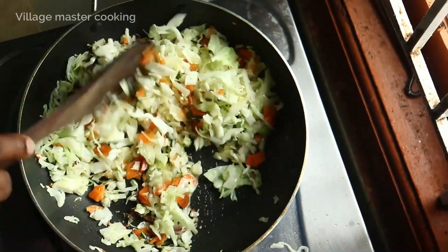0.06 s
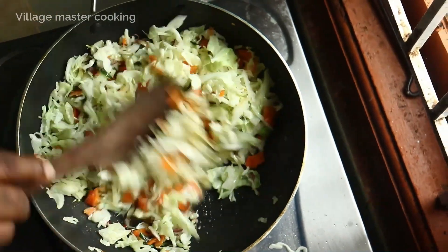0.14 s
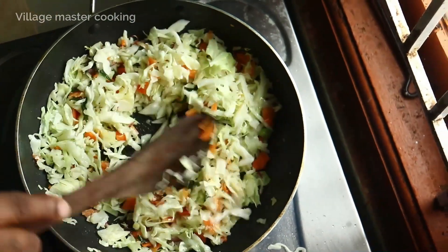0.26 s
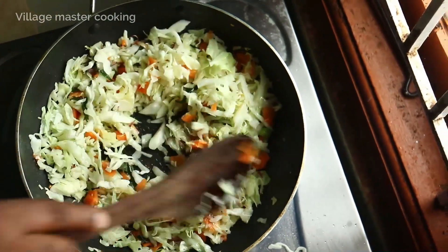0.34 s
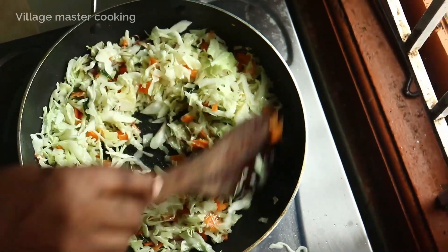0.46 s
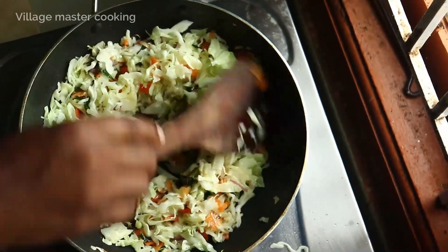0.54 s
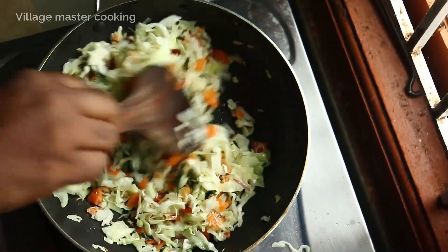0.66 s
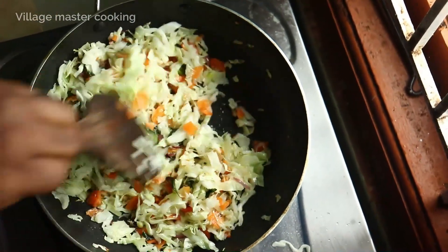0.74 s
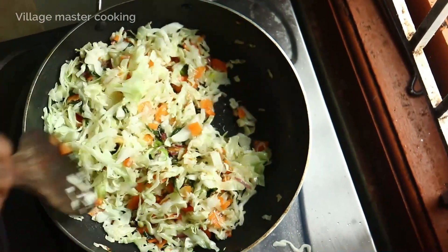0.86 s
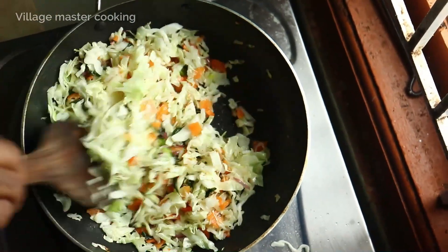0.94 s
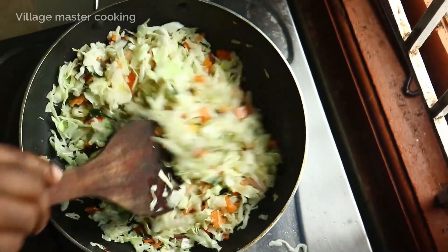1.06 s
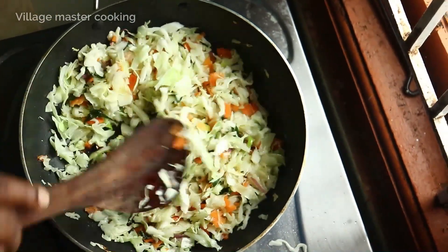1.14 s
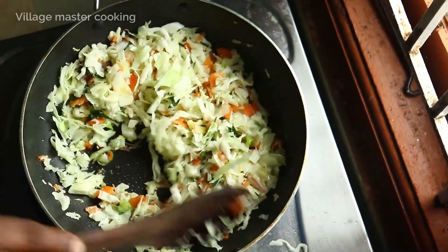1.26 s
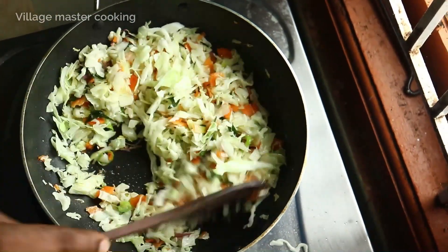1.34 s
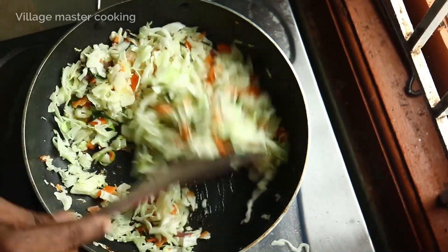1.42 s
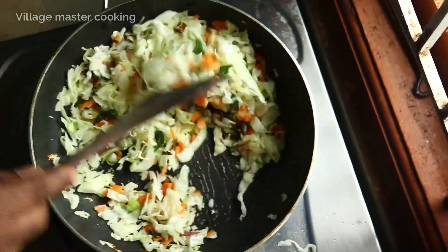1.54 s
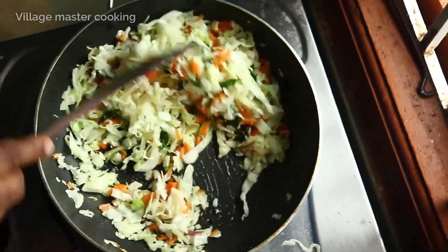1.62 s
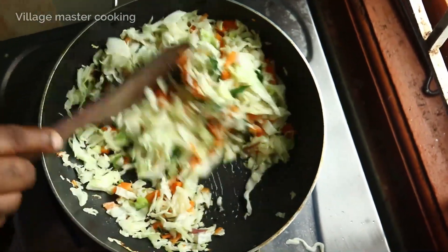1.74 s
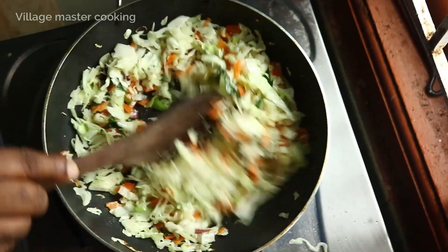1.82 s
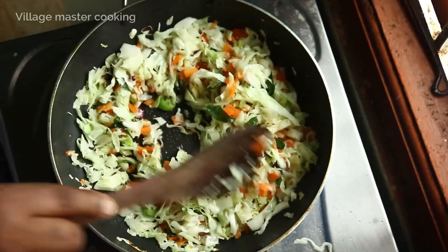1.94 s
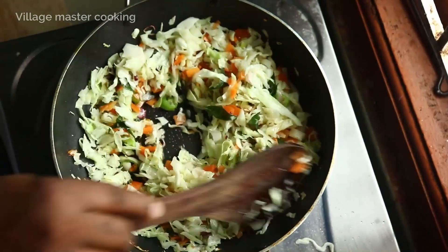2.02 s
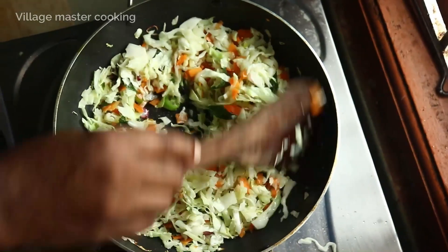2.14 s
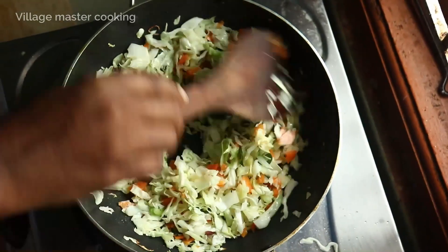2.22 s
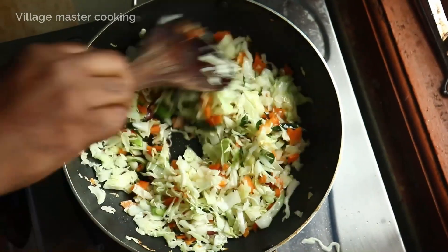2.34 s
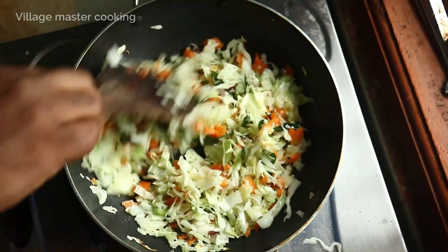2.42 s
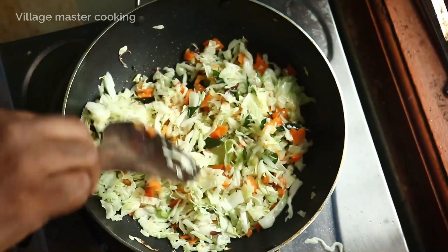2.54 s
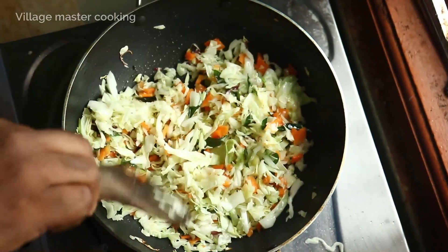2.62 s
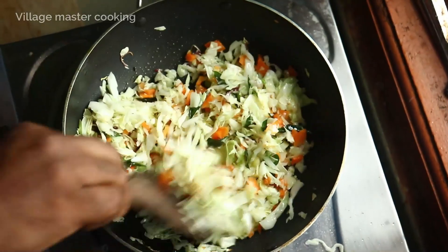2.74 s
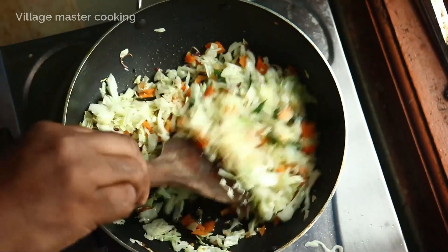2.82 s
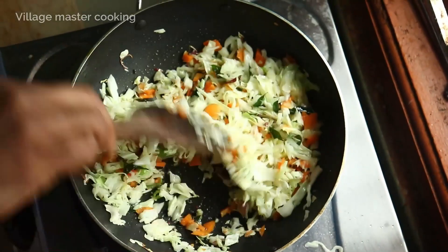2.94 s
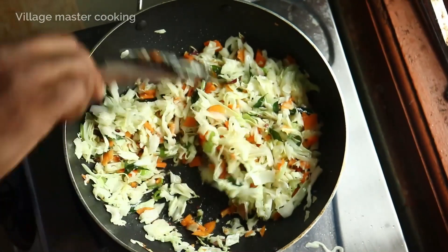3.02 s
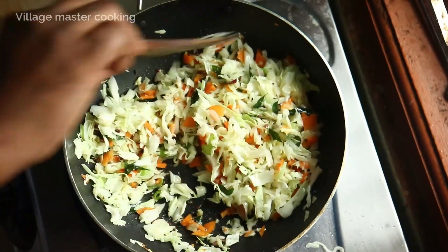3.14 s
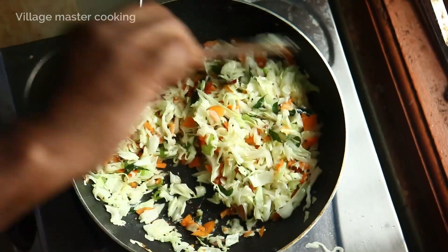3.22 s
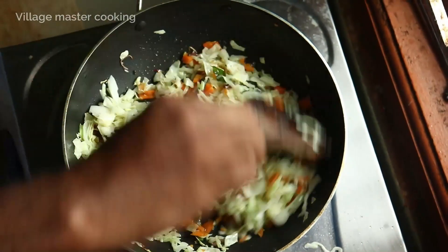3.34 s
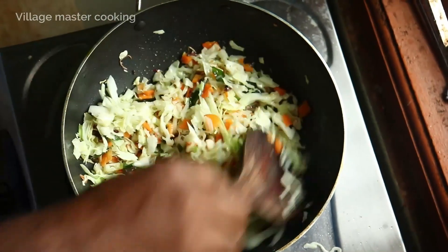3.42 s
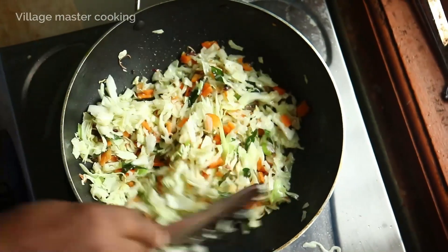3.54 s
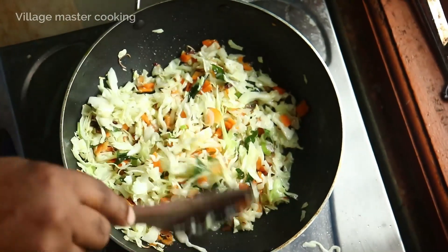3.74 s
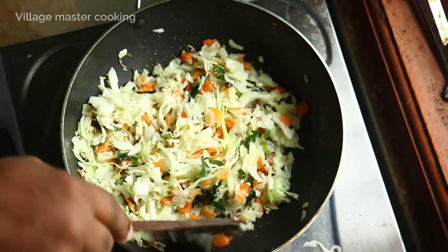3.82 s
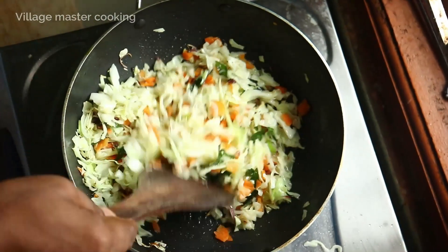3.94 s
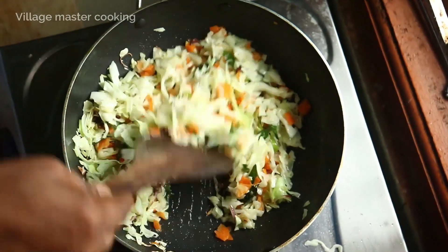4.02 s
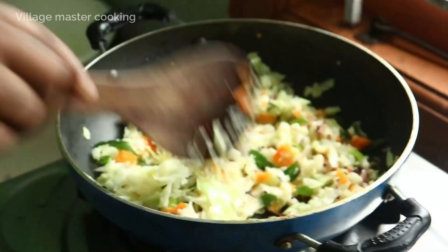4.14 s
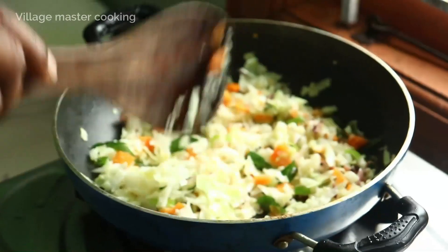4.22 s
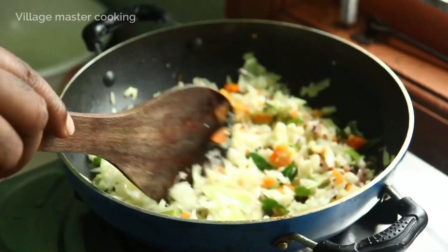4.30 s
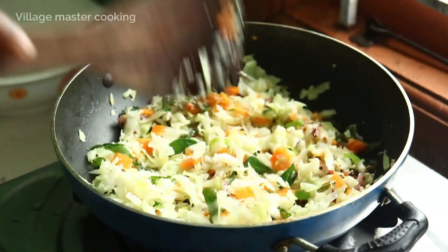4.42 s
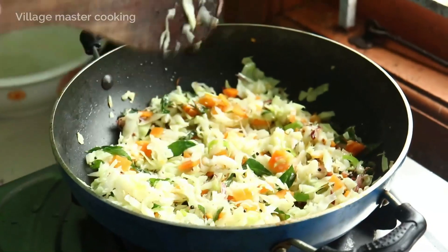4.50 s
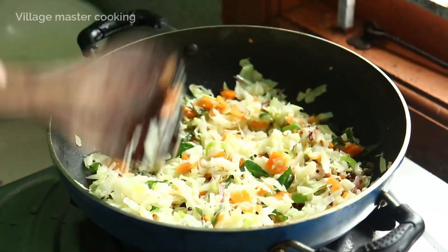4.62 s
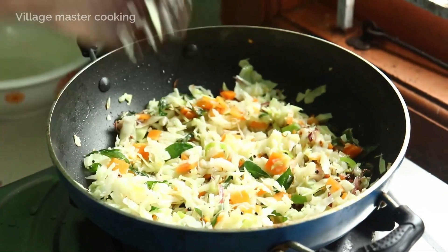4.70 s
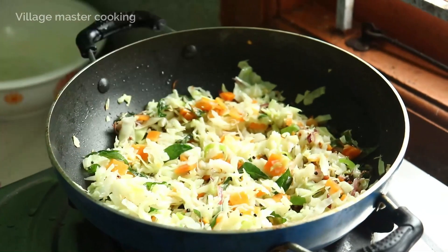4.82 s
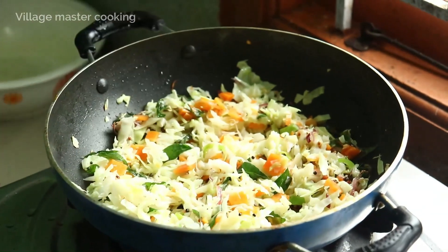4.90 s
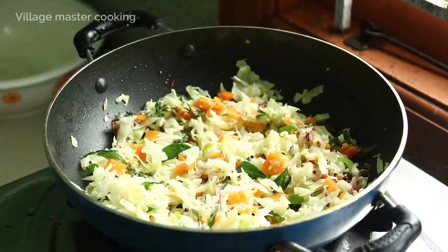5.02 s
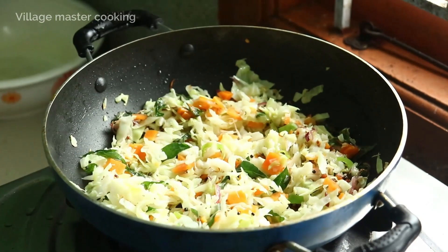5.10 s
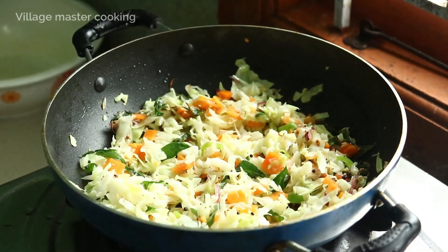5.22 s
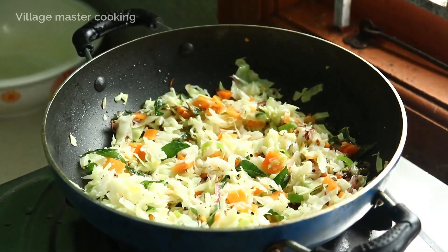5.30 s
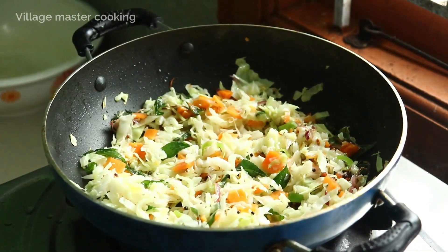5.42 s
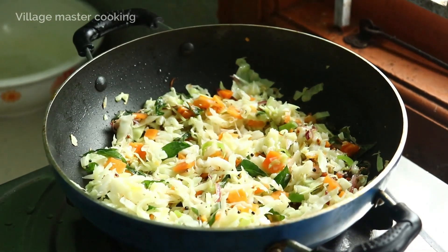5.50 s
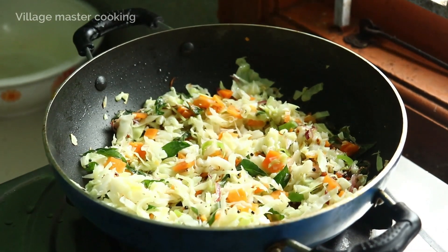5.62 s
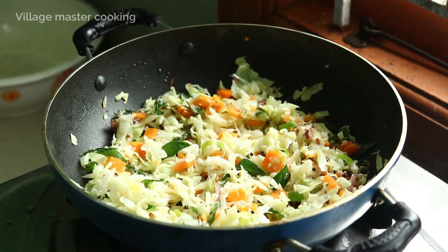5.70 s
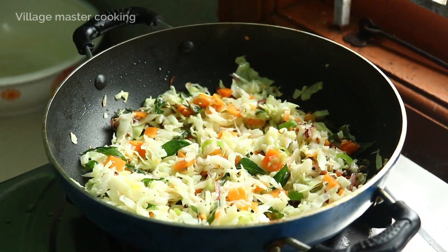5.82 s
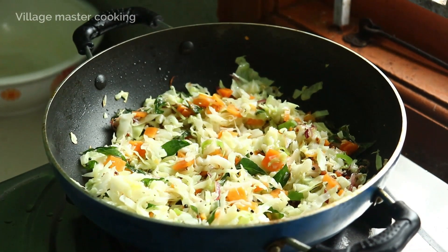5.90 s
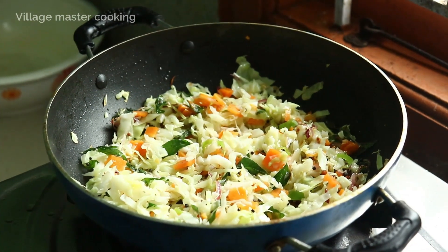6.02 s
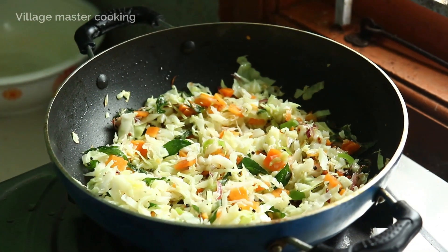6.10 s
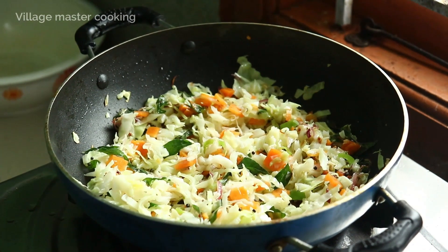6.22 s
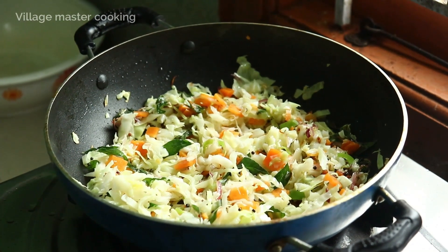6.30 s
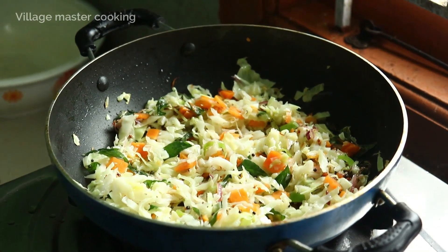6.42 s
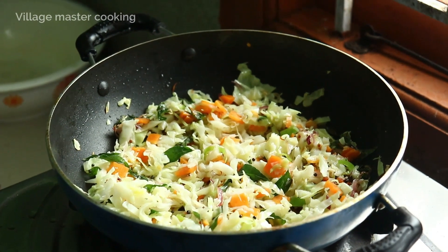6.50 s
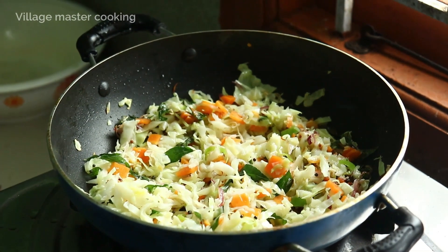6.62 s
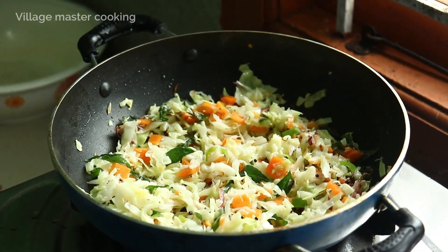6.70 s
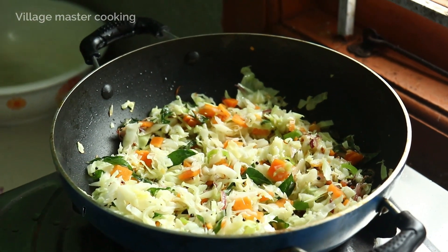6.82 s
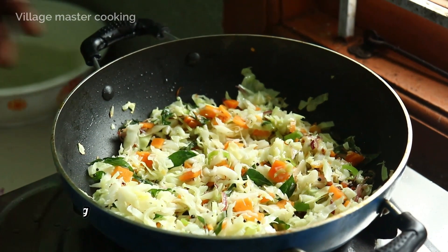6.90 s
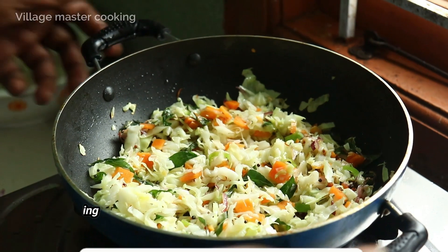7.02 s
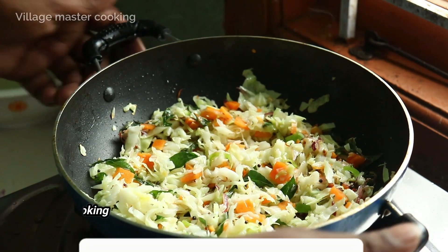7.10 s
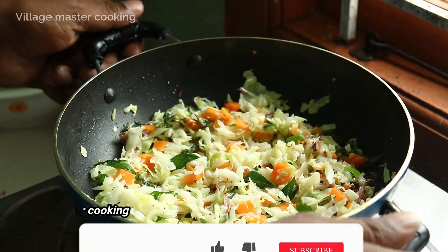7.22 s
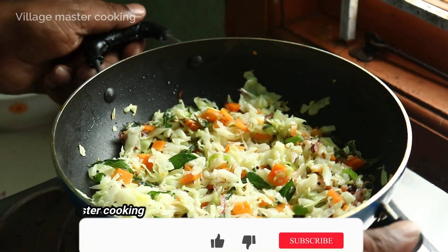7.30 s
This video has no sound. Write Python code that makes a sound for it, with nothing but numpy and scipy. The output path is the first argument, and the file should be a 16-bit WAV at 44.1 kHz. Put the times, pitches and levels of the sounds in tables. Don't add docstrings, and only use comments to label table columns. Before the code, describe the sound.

Close, steady frying hiss with popping oil, brisk wooden knocks on a ringing metal pan, then a dropped spatula rocking to rest.

```python
import sys
import numpy as np
from scipy import signal
from scipy.fft import rfft, irfft, next_fast_len
from scipy.io import wavfile
from scipy.ndimage import uniform_filter1d, map_coordinates

SR = 44100
rng = np.random.default_rng(int(sys.argv[2]) if len(sys.argv) > 2 else 0)


def nominal_scale(level):
    x = np.asarray(level, float) / 20
    return 10 ** x


def transcribe(signal):
    frames = np.atleast_2d(signal).T
    limited = np.clip(frames, -1, 1)
    pcm = np.round(limited * 32767).astype(np.int16)
    wavfile.write(sys.argv[1], SR, pcm)


N = 324135

# start in seconds, end in seconds.
CUT = (4.1838, 4.1943)
# frequency in Hz, level in dB, t60 in seconds.
PAN = [(208.5, -4, 0.48), (229.7, 0.5, 0.34), (320, 1, 0.53), (417.2, -0.5, 0.22), (448, -8, 0.46),
       (470, -5, 0.51), (608, -2, 0.66), (655, -2, 0.6), (770, 1.5, 0.096), (808, -0.5, 0.29),
       (887.6, 2.5, 0.12), (945, -8, 0.09), (1060, -7.5, 0.19), (1135, -5.5, 0.19), (1348, 0, 0.059),
       (1637, 1.5, 0.11), (1760, -2.5, 0.15), (2010, 4.5, 0.089), (2310, -1.5, 0.11), (2860, -8, 0.28)]
# frequency in Hz, left-right likeness from -1 to 1.
ECHO_ALIKE = [(200, 1), (500, 0.84), (1000, 0.35), (2500, 0.03), (6000, 0.045)]
# start in seconds, frequency in Hz, peak in dB, t60 in seconds.
NOTES = [(0.086, 317, -29.5, 0.4), (0.207, 830, -30, 0.068), (0.22, 326, -18, 0.15),
         (0.342, 850, -29, 0.12), (0.588, 890, -11.5, 0.094), (0.6, 212, -18.5, 0.27),
         (0.884, 313.6, -22.5, 0.33), (0.93, 315.3, -30, 1), (1.056, 319, -22.5, 0.26),
         (1.193, 830, -31, .08), (1.472, 216, -30.5, 0.26), (1.69, 308, -25, 0.19), (1.846, 320, -21, 0.42),
         (2.21, 896, -12.5, 0.083), (2.22, 605, -18.5, 0.47), (2.897, 315, -29, .35),
         (2.91, 411, -30, 0.36), (2.98, 310, -36, 0.93), (3.228, 1990, -11, .03), (3.229, 2054, -20, 0.21),
         (3.229, 938, -16, 0.099), (3.229, 1135, -21, 0.089), (3.229, 303, -22.5, 0.38),
         (3.285, 1627, -29, 0.47), (3.388, 1800, -21, .05), (3.391, 800, -22, 0.17), (3.982, 228, -26, .4),
         (3.985, 375, -26, 0.095), (4.442, 310, -23, .2), (5.405, 2930, -23, 0.073),
         (5.405, 1650, -32, .04), (5.575, 1530, -27, 0.11), (5.583, 1520, -28, 0.17),
         (5.708, 2015, -21, .1), (5.708, 4260, -16, 0.045), (5.708, 3400, -23, .04),
         (5.719, 1590, -18.5, 0.086), (5.719, 2150, -21, .12), (5.74, 2010, -27, .25),
         (5.71, 301, -32, 0.17), (7.321, 457, -26, .2)]
MORE_NOTES = [(0.595, 616, -24, .35), (1.2, 655, -31, 0.68), (2.23, 655, -24, 0.6), (2.214, 236, -21, 0.33),
              (3.99, 655, -31, 0.34), (4.742, 216, -15.5, 0.82), (4.75, 441, -14, 0.54),
              (4.75, 484, -18, 0.47), (4.745, 608, -15, 0.46), (4.745, 560, -19, 0.33),
              (4.742, 1860, -12, .2), (4.759, 1308, -14, 0.36), (4.76, 1644, -22, 0.68),
              (4.749, 1230, -21, 0.27), (4.75, 2300, -27, .3), (4.75, 2810, -15, .3),
              (4.75, 3330, -23, .25), (5.413, 1920, -22, 0.1), (5.61, 1527, -33, 0.35),
              (7.32, 1610, -29, .1), (7.34, 1190, -24, .1), (0.25, 314, -25, .3), (0.4, 834, -28, 0.3),
              (0.47, 315, -36, .9), (1.735, 313, -32.5, .6), (2.02, 316, -30, 0.63),
              (2.352, 315, -30, 0.32), (2.39, 904, -36, .5), (2.39, 655, -29, 0.45),
              (3.33, 304.7, -32, 0.79), (5.406, 1880, -15, 0.054), (5.406, 2270, -25, .05),
              (5.708, 2280, -19, 0.068)]
STROKE_RISE_S = 0.03


def unit(x):
    return x / np.sqrt(np.mean(x ** 2) + 1e-20)


def along(points, hz):
    f, v = np.transpose(points)
    return np.interp(np.log(hz + 1), np.log(f + 1), v)


def curves(rows):
    s, *cols = np.transpose(rows)
    return [np.interp(np.arange(N) / SR, s, c) for c in cols]


def wobble(rate):
    knots = rng.standard_normal(int(N * rate / SR) + 4)
    return map_coordinates(knots, [np.arange(N) * rate / SR])


def filtered(x, response):
    m = next_fast_len(x.shape[-1] + 8192)
    spectrum = rfft(x, m) * response(np.fft.rfftfreq(m, 1 / SR))
    return irfft(spectrum, m)[..., :x.shape[-1]]


def high(x, hz):
    return signal.sosfilt(signal.butter(4, hz, "high", fs=SR, output="sos"), x)


def spread(pair, alike):
    def weights(hz):
        angle = np.arccos(np.clip(along(alike, hz), -1, 1)) / 2
        return np.array([np.cos(angle), np.sin(angle)])
    mid, side = filtered(pair, weights)
    return np.array([mid + side, mid - side])


def add(out, s, sound):
    start = round(s * SR)
    out[:, start:start + sound.shape[1]] += sound[:, :N - start]


def patchy(depth_db):
    z = signal.stft(rng.standard_normal((2, N)), nperseg=256)[2]
    field = uniform_filter1d(rng.standard_normal(z.shape[1:]), size=12, axis=0)
    field = uniform_filter1d(field, size=10, axis=1)
    return unit(signal.istft(z * nominal_scale(depth_db * unit(field)), nperseg=256)[1][:, :N])


def grains(s, hz, cycles, size):
    t = np.arange(128) / SR
    decay = np.exp(-t * (hz / cycles)[:, None])
    shape = size[:, None] * np.sin(2 * np.pi * hz[:, None] * t) * decay
    where = np.round(s * SR).astype(int)[:, None] + np.arange(len(t))
    return np.bincount(where.ravel(), shape.ravel(), N + SR)[:N]


def crackle(count, scatter_db):
    when, size, pitch = rng.random((count, 3)).T
    level = nominal_scale(-scatter_db * np.log(size + .035))
    burst = grains(when * N / SR, 1500 * nominal_scale(20 * pitch), .9, level)
    return unit(filtered(burst, lambda f: 1 + (f / 6500) ** 2))


def sizzle():
    # time in seconds, level in dB.
    boil = [(0.0, -29), (0.44, -29), (0.8, -30), (1.28, -28.5), (1.61, -30), (2.38, -30), (2.8, -29),
            (3.3, -30.5), (3.61, -29.5), (4.18, -29), (4.19, -31), (4.8, -31), (5.5, -31.5), (6.92, -32.5),
            (7.35, -32.5)]
    # frequency in Hz, density in dB per Hz.
    colours = [(180, -52), (300, -11.5), (331, -12.5), (360, -17), (385, -22), (494, -21), (725, -16.5),
               (930, -11.5), (1010, -18.5), (1340, -10), (2840, -6.5), (3830, -2.5), (5520, -6.5),
               (12300, -10), (16000, -15)], [(180, -24), (300, -17.5), (418, -18.5), (494, -31), (528, -17), (614, -22),
                              (713, -7), (946, -12), (1560, -6.5), (1970, -8), (2790, -1.5), (3460, -4.5),
                              (4160, -1.5), (5610, -1), (10500, -11.5), (16000, -17)]
    # frequency in Hz, left-right likeness.
    likenesses = [(60, 0.92), (150, 0.98), (380, 0.94), (950, 0.57), (2380, 0.33), (5980, 0.13),
                  (15000, -0.28)], [(60, 0.98), (150, 0.69), (380, 0.93), (950, 0.87), (2380, 0.31),
                                       (5980, 0.34), (15000, 0.045)]
    # frequency in Hz, left-right difference in dB.
    leans = [(60, 0.0), (180, 1), (550, 1.5), (1650, -1), (4970, -4), (15000, -3.0)], [(60, 0.0), (180, 0.5), (550, 0.94), (1650, -1.8), (4970, 0.96),
                                 (15000, -0.06)]
    sprays = (-0.23, -4)
    fry_db, = curves(boil)
    hiss = patchy(depth_db=0.53)
    bubbles = np.array([crackle(count=12000, scatter_db=3.5) for _ in "ab"])
    gusts_db = 0.2 * wobble(6) + 0.75 * wobble(40) + 0.5 * wobble(70)
    water = (hiss + nominal_scale(-6.5) * bubbles) * nominal_scale(gusts_db)
    views = []
    for colour, alike, lean, spray_db in zip(colours, likenesses, leans, sprays):
        def tint(hz):
            return nominal_scale(along(colour, hz) + np.outer([.5, -.5], along(lean, hz)))
        sound = filtered(spread(water, alike), tint)
        fine = filtered(sound, lambda hz: 1 / (1 + (7500 / (hz + 1)) ** 6))
        coarse = sound - fine
        spray = nominal_scale(fry_db + spray_db + 2 + 0.46 * wobble(30)) * unit(fine)
        views.append(nominal_scale(fry_db + 2.5) * coarse / np.std(coarse) + spray)
    return np.where(np.arange(N) < CUT[1] * SR, *views)


def strokes(rows, t60):
    t = np.arange(N) / SR
    power = 0
    for s, hold, db in rows:
        rise = np.clip((t - s) / STROKE_RISE_S, 0, 1)
        power = power + nominal_scale(db - 60 * np.clip(t - s - hold, 0, None) / t60) ** 2 * rise
    return power


def scrape():
    # time in seconds, level in dB.
    handling = [(0.0, -42.5), (1.0, -40.5), (1.6, -43.5), (2.55, -40), (2.8, -58), (3.25, -62), (3.6, -37),
                (3.85, -45.5), (4.15, -43), (4.65, -44.5), (5.3, -50.5), (5.9, -50), (6.25, -59),
                (6.5, -58), (6.75, -46), (7.35, -48)]
    # start in seconds, length in seconds, drag in dB, rocking of the grate in dB.
    stirs = [(0.185, 0.092, -29, -44), (0.338, 0.1, -26, -50.5), (0.6, 0.03, -27.5, -61),
             (1.082, 0.091, -49, -46), (1.19, 0.06, -29, -44), (1.5, 0.27, -59, -53),
             (1.86, 0.06, -32, -48), (1.97, 0.066, -30.5, -51), (2.25, 0.071, -38, -63),
             (2.38, 0.057, -31, -63), (2.884, 0.13, -55, -46), (3.252, 0.087, -54, -45.5),
             (3.37, 0.11, -28, -53), (4.806, 0.054, -41, -42), (4.94, 0.095, -33, -48),
             (5.384, 0.067, -33.5, -48), (5.575, 0.047, -35, -46), (5.7, 0.053, -35.5, -42),
             (6.5, 0.71, -58, -58.5)]
    # start in seconds, level in dB.
    thumps = [
        (0.45, -63),
        (1.79, -54.5),
        (2.4, -57),
        (3.03, -63),
        (3.45, -50),
        (4.5, -63),
        (5.72, -37.5),
        (6.5, -68),
    ]
    # frequency in Hz, density in dB per Hz.
    rumble = [(20, -25), (45, -19), (66, -10), (79, 3), (92, -13), (115, -9.5), (200, -47), (400, -120)]
    idle = nominal_scale(curves(handling)[0])
    stir = np.sqrt(idle ** 2 + strokes([row[:3] for row in stirs], t60=0.34))
    rocking = strokes([(s, hold, db) for s, hold, _, db in stirs], t60=0.63)
    rock = np.sqrt((idle * nominal_scale(-18)) ** 2 + rocking)
    jolt = np.sqrt(2 * strokes([(s, STROKE_RISE_S, db) for s, db in thumps], t60=0.99))
    thump_hz = 77.5 * (1 + 0.039 * wobble(11))
    boom = jolt * np.sin(2 * np.pi * np.cumsum(thump_hz) / SR)
    drag = patchy(depth_db=2.5) * nominal_scale(1.5 * wobble(14) + 1.5 * wobble(45))

    def mode(f, hz, width):
        return 1j * f * width / (hz * hz - f * f + 1j * f * width)

    def body(f):
        return sum((-1) ** k * nominal_scale(db - 4.2 * np.log2(hz / 300)) * mode(f, hz, 10.3 / t60)
                   for k, (hz, db, t60) in enumerate(PAN))

    hum = unit(spread(filtered(drag, body), ECHO_ALIKE))
    noise = rng.standard_normal((3, N))
    grate = unit(filtered(noise[0], lambda f: mode(f, 153.7, 21.5) ** 2))
    stove = filtered(noise[1:], lambda f: nominal_scale(along(rumble, f)))
    stove = unit(spread(stove, [(30, .3), (70, 1.0), (110, 0.79)]))
    steady = nominal_scale(-62 - 0.5 * wobble(8)) * stove
    return nominal_scale(-1.5) * stir * hum + nominal_scale(2.5) * rock * grate + steady + boom * nominal_scale([[1], [-1]])


def squeak():
    # time in seconds, slips per second, level in dB.
    slipping = [(0, 517, -40), (.04, 519, -40), (.06, 512, -46), (.1, 520, -46), (.122, 529, -36),
                (.175, 530, -39), (.2, 520, -52), (.21, 520, -70)]
    # multiple of the slip rate, level in dB.
    harmonics = [(2, -5), (3, 3), (4, -3)]
    rate, db = curves(slipping)
    turn = 2 * np.pi * np.cumsum(rate * (1 + 0.0078 * wobble(43))) / SR
    return nominal_scale(db) * sum(nominal_scale(level + 1.3 * wobble(30)) * np.sin(k * turn) for k, level in harmonics)


def carriers(modes):
    hz, level, t60 = np.transpose(modes)[:, :, None]
    t = np.arange(30 * 1024) / SR
    free = nominal_scale(level - 60 * t / t60) * np.exp(2j * np.pi * hz * t)
    return hz[:, 0], free.reshape(len(hz), 30, 1024)


def besides(modes, s):
    hz, free = modes
    hush_s, hush_db, hush_width = .04, -14, .05
    clear = [note for start, note, *_ in NOTES + MORE_NOTES if -hush_s / 2 < start - s < hush_s] + [1]
    near = np.abs(np.log(hz[:, None] / clear)).min(axis=1) < hush_width
    return hz, free * nominal_scale(hush_db * near)[:, None, None]


def echo(length):
    # frequency in Hz, t60 in seconds.
    kitchen = [(100, 0.061), (300, 0.66), (1000, 0.51), (3000, 0.33), (8000, 0.27)]
    hz, t, z = signal.stft(rng.standard_normal((2, length)), SR, nperseg=256)
    decay = nominal_scale(-60 * t / along(kitchen, hz)[:, None])
    tail = signal.istft(z * decay, SR, nperseg=256)[1]
    build_up = 1 - np.exp(-np.arange(tail.shape[1]) / SR / 0.014)
    tail = spread(tail * build_up, ECHO_ALIKE)
    return tail / np.linalg.norm(tail[0])


def blow(landing, modes, low_hz, rise_s, rough, chatter_s, wood_db, wet_db):
    hz, free = modes
    t = np.arange(free[0].size) / SR
    a, b, c, d = rng.standard_normal((4, len(hz), free.shape[1] + 1))
    unlike = np.sqrt(1 - np.clip(along(ECHO_ALIKE, hz), 0, 1))[:, None] * [[[.5]], [[-.5]]]
    loose = rough * np.clip(hz / 700, .15, 1.3)[:, None]
    settle = np.clip(np.arange(a.shape[1]) / 3.6, .35, 1)
    waver = 1 + settle * (loose * (a + 1j * b) + unlike * (c + 1j * d))
    waver = waver * nominal_scale(along(landing, hz) + rng.normal(0, 1.7, hz.shape))[:, None]
    waver[..., 0] *= np.clip(hz / 560, .3, 1)
    part = np.arange(free.shape[2]) / free.shape[2]
    steps = free.transpose(1, 0, 2)
    ring = (waver[..., :-1].transpose(2, 0, 1) @ steps).imag * (1 - part)
    ring = ring + (waver[..., 1:].transpose(2, 0, 1) @ steps).imag * part
    ring = ring.transpose(1, 0, 2).reshape(2, -1) * (1 - np.exp(-t / rise_s))
    last_hz, last_db = landing[-1]
    colour = landing + [(last_hz * 3, last_db - 16), (16000, last_db - 50)]
    wood = filtered(rng.standard_normal(SR // 5), lambda f: nominal_scale(along(colour, f)))
    chatter = nominal_scale(wood_db - 60 * t / chatter_s) * (1 - np.exp(-t / 0.00026))
    wood = wood * chatter[:len(wood)]
    wet = signal.fftconvolve(wood[None], echo(SR * 11 // 20), axes=1)[:, :len(t)]
    return high(ring + np.pad(wood, (0, len(t) - len(wood))) + nominal_scale(wet_db) * wet, low_hz)


def spatula():
    # start in seconds, strength in dB, ring of the pan floor in dB, weight on the wall in dB.
    knocks = [(0.084, -47.5, 12.5, 6), (0.2049, -37, 5, -5), (0.2164, -35, 6, -11),
              (0.3402, -28.5, -3, -13), (0.4198, -37, 1, -17), (0.883, -36.5, 0, -9), (1.054, -35, 2, 1),
              (1.471, -46, -19, 10), (1.6883, -37.5, 6, -0.5), (1.8424, -29.5, 2.5, -7),
              (2.3497, -36, -4, 8), (2.469, -38, -3.5, -12), (2.6094, -42, -6, 2.5), (2.8894, -41, -11, 10),
              (2.9069, -33, -4, -5), (3.5488, -39.5, 6.5, 2), (3.9838, -29.5, -5, 2.5),
              (4.378, -57, 12.5, 6), (4.442, -40.5, 8, 4.5), (7.3175, -27.5, -6, -1), (7.341, -26, 2, -16)]
    # start in seconds, strength, floor ring, wall weight, extra clack in dB.
    edge_on = [
        (0.588, -19, -19, -4, 1.2),
        (2.2077, -19, -17, -2.5, 2.8),
        (1.191, -25, -13, -7, 1),
        (1.9638, -29.5, -1, -10, 3.5),
        (3.228, -27.5, -2, -2.5, 7.2),
        (3.3866, -25, -5, -20, 4.7),
    ]
    landing_db = (2.5, 3.5, -3.5, -2)
    # frequency in Hz, level in dB.
    drop = [(80, -36), (170, -19.5), (300, -17.5), (900, -17), (2000, -16), (3500, -22.5), (5200, -28)]
    # frequency in Hz, level in dB, t60 in seconds.
    counter = [(77.4, 2, 0.97), (154.5, 5.5, 0.77), (211.5, 4, 0.57), (303, 7, 0.2), (345, 2, 0.3),
               (394, 4, 0.28), (416, 5, 0.41), (484, 2, 0.4), (660, 15, 0.3), (734, 3, 0.45),
               (823, 6, 0.55), (890, 9.5, 0.36), (1283, 6, 0.3), (1500, -11, 0.084), (1626, -8, 0.38),
               (1740, 4, 0.14), (1900, -3, 0.15), (2250, -10.5, 0.16), (2600, 3, 0.27), (3400, -10, 0.22)]
    # frequency in Hz, level in dB, t60 in seconds.
    blade = [(1382, 6, 0.078), (1530, -4.5, 0.18), (1645, -2, 0.12), (1910, 1, 0.076), (1980, 5, 0.13),
             (2200, -1, 0.14), (2590, 1, 0.092), (2990, -7, 0.049), (3400, -8, .08), (4520, 2, 0.043)]
    # start in seconds, strength in dB, counter jolt in dB, blade ring in Hz.
    taps = [
        (5.404, -20, -27, 1940),
        (5.414, -28, -27, 1950),
        (5.573, -20, -20, 1500),
        (5.583, -25, -22, 1530),
        (5.707, -16, -20.5, 1960),
        (5.718, -20, -19, 1670),
    ]
    out, pan, rest = np.zeros((2, N)), carriers(PAN), carriers(counter[:6] + blade)
    for s, db, floor_db, wall_db, *edge_db in sorted(knocks + edge_on):
        extra_db = sum(edge_db)
        places = db + np.add(landing_db, [wall_db, floor_db, 0, 0.37 * extra_db])
        clack = -21.5 + 0.48 * db + extra_db
        landing = list(zip((220, 315, 560, 880, 2000), [*places, clack]))
        rise_s = 0.0011 if edge_db else 0.0026
        add(out, s, blow(landing, besides(pan, s), low_hz=176, rise_s=rise_s, rough=0.6,
                         chatter_s=0.038, wood_db=13.5, wet_db=8.0))
    drop_s = 4.741
    add(out, drop_s, blow(drop, besides(carriers(counter), drop_s), low_hz=65.6, rise_s=0.0032, rough=0.71,
                          chatter_s=0.094, wood_db=22, wet_db=6.0))
    for s, db, jolt_db, hz in taps:
        levels = [2.7 * jolt_db + 23, jolt_db - 4.5, jolt_db - 7.5, -12, -4, -13, -19]
        places_hz = (80, 300, 900, hz * 0.86, hz, hz * 1.23, 4500)
        landing = list(zip(places_hz, db + np.array(levels)))
        add(out, s, blow(landing, besides(rest, s), low_hz=50, rise_s=0.00045, rough=0.59,
                         chatter_s=0.032, wood_db=21.5, wet_db=1.0))
    return out


def notes():
    out, t = np.zeros((2, N)), np.arange(SR // 2) / SR
    rise_cycles, waver = 1.2, 0.0026
    for s, hz, db, t60 in NOTES + MORE_NOTES:
        drift = map_coordinates(rng.standard_normal(30), [t * 45])
        lead = rng.normal(0, hz / 1500) * np.array([[.5], [-.5]])
        ring = np.sin(2 * np.pi * hz * np.cumsum(1 + waver * drift) / SR + lead)
        add(out, s, nominal_scale(db - 60 * t / t60) * (1 - np.exp(-t * hz / rise_cycles)) * ring)
    return out


def pops():
    # start in seconds, peak in dB, frequency in Hz, left-right difference in dB.
    bursts = [(0.152, -28, 1590, -10), (0.4627, -15, 4720, -2.5), (0.607, -22, 1540, -2.5),
              (0.6734, -33, 3900, -5), (0.7834, -20, 4000, -1), (1.0128, -10.5, 5040, -1),
              (1.419, -25, 3810, -6), (1.6294, -18, 6050, -2.5), (2.008, -16, 4770, -2.5),
              (2.849, -21, 4700, -7), (3.34, -19, 3270, -3.5), (4.1714, -15, 4870, -2.0),
              (5.2614, -26, 4270, 4), (5.9144, -32, 4760, 5), (6.0198, -20.5, 2200, 0.0),
              (6.132, -25, 4280, 1.0), (6.1994, -26, 4610, 0.5), (6.2527, -16, 5000, 1.0),
              (6.3102, -21, 2860, 0.0), (7.2333, -22, 4190, 4)]
    # start in seconds, right level in dB, frequency in Hz, left-right difference in dB.
    spit = [
        (4.2024, -6, 6000, -14),
        (4.2022, -18, 800, -9),
        (4.2032, -12, 4500, -10),
    ]
    s, db, hz, pan_db = np.transpose(bursts)
    far = [grains(s, hz, 2.9, nominal_scale(db + 5.5 + side * pan_db)) for side in (.5, -.5)]
    s, db, hz, pan_db = np.transpose(spit)
    near = [grains(s, hz, 1.3, nominal_scale(db + 2 + side * pan_db)) for side in (1, 0)]
    return high(np.array(far), 640) + high(np.array(near), 210)


def scene():
    return sizzle() + pops() + scrape() + squeak() + (spatula() + notes()) * nominal_scale([[.4], [-.4]])


def band_limit(x):
    return signal.sosfilt(signal.butter(12, 16550, fs=SR, output="sos"), x)


def record(dry):
    t = np.arange(N) / SR
    away = np.clip(np.maximum(CUT[0] - t, t - CUT[1]) / 0.0008, .004, 1)
    x = filtered(dry * away, lambda hz: hz < 16100)
    x = x / (1 + np.abs(x / 1.01) ** 8) ** (1 / 8)
    return band_limit(x)


dry = scene()
out = record(dry)
transcribe(out)
```